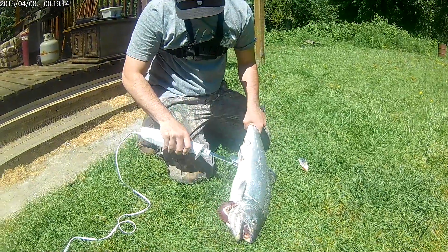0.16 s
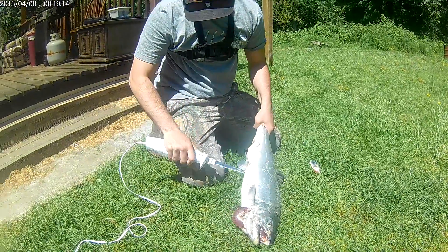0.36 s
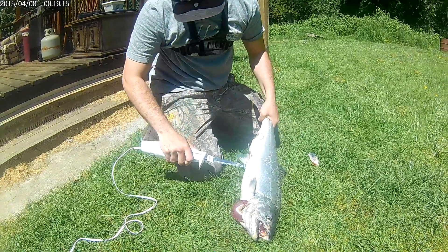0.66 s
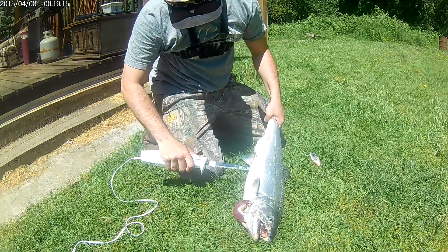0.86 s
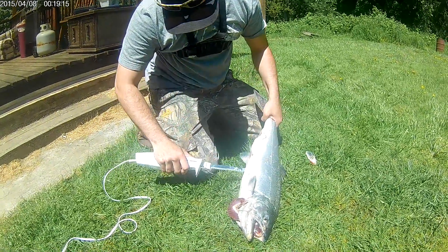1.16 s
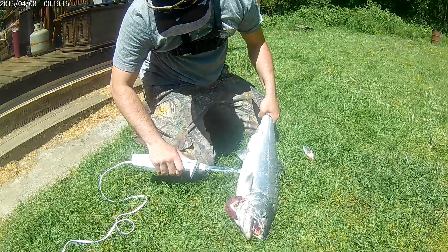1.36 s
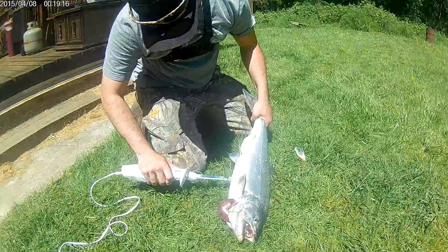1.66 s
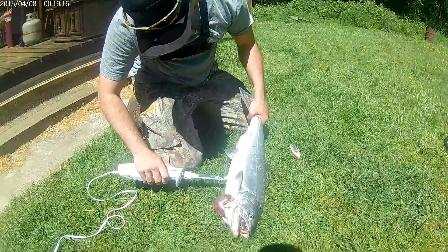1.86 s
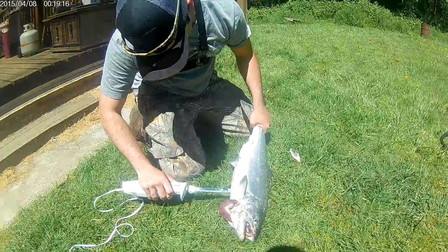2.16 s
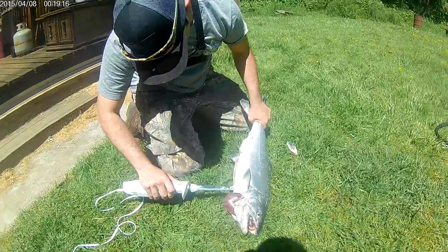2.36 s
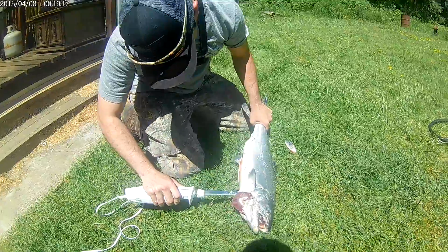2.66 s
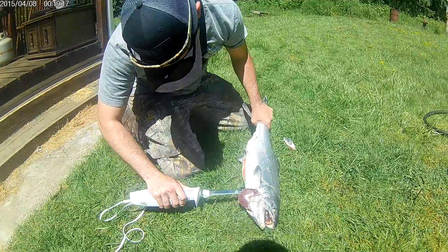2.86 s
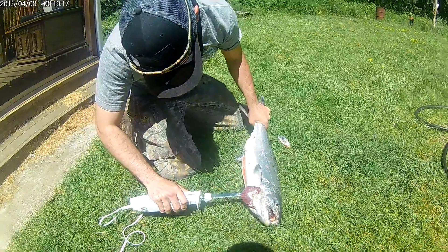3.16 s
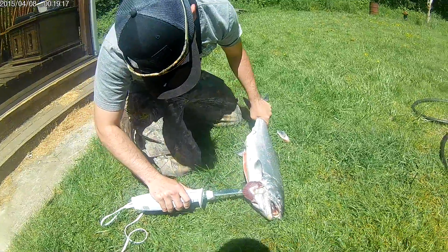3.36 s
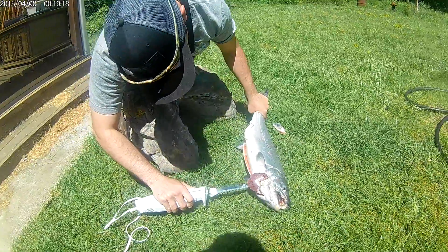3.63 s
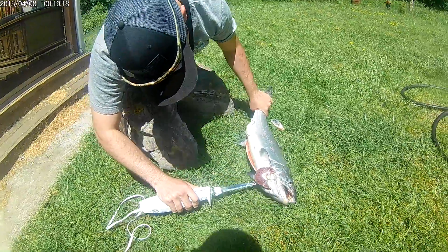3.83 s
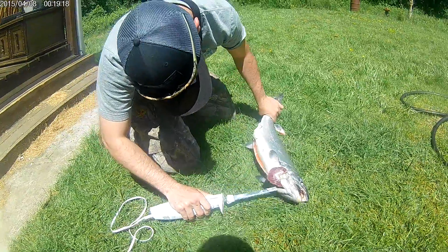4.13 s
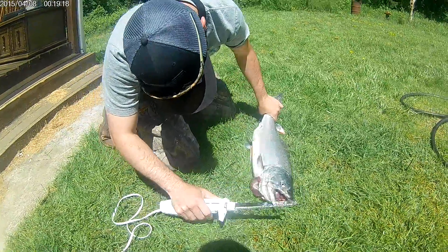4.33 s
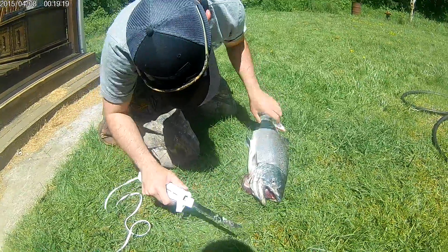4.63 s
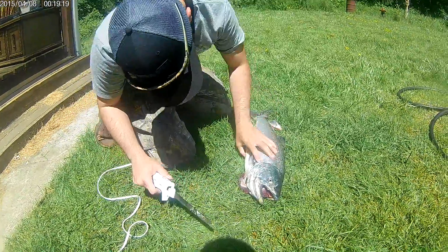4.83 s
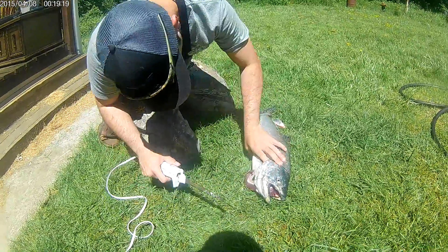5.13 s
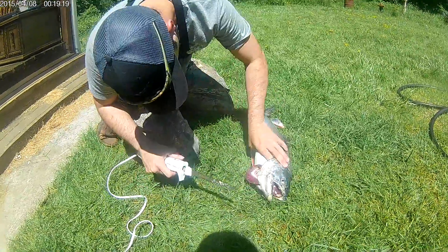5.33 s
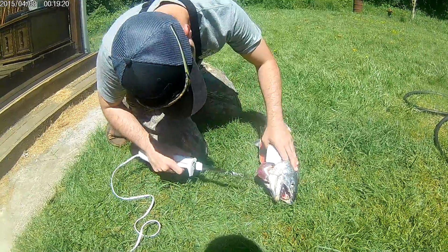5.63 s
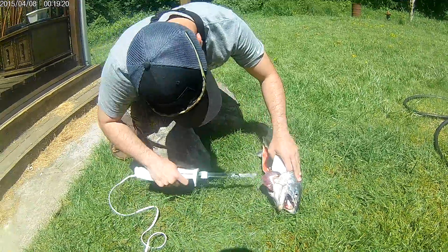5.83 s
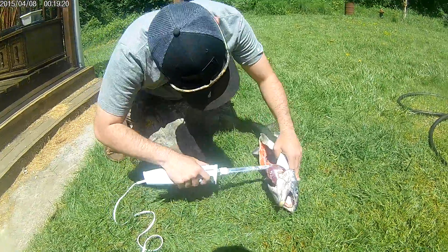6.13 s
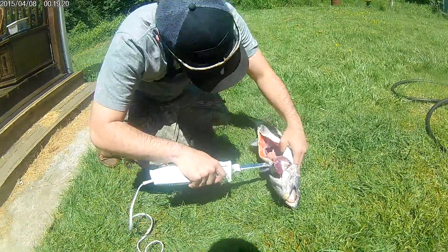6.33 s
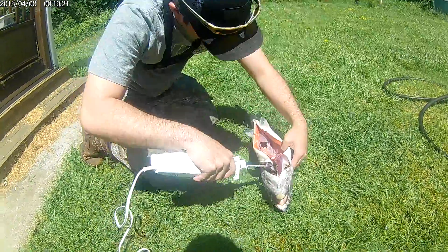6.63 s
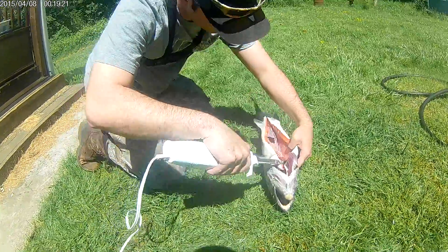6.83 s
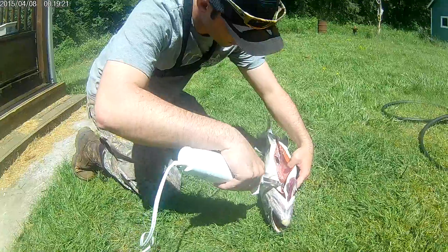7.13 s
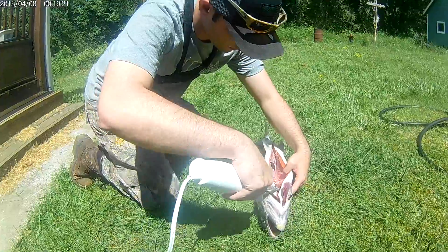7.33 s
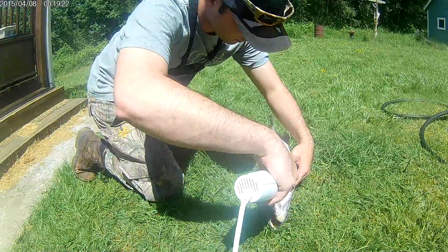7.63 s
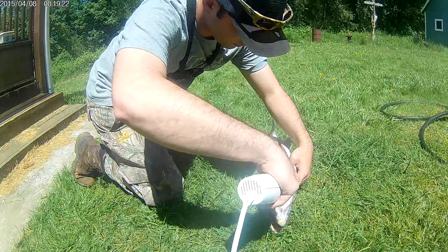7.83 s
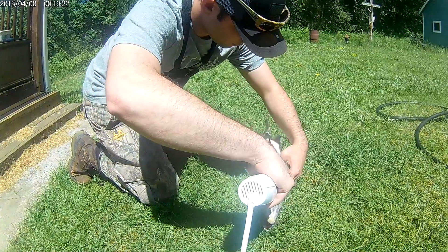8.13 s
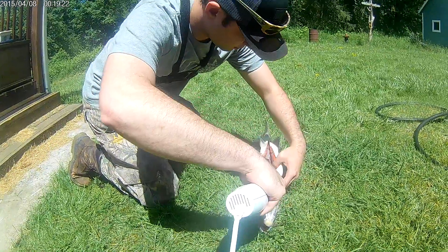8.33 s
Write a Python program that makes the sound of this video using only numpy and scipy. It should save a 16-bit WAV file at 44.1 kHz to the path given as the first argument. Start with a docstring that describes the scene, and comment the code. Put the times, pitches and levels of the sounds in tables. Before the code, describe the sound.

Outdoors on a lawn, a small cased camera hears an electric knife sawing a fish: fast dry clacking at about thirty strokes a second, with gear grind and faint motor whine. It slows briefly, restarts three times, then coasts to a stop near five seconds. Plastic handling knocks and rubs dot the cutting, then grow loud and crowded over soft wind rumble and hiss.

```python
"""The blades of an electric knife clack as it saws through a fish on a lawn, heard by a small camera
in a closed plastic case. Clicks and chatter at each stroke end, with gear grind between, excite
resonances of handle and blades; the motor whine is a set of sines locked to its rotation.
Throughout, and alone at the end, the hand that holds the case knocks and rubs it: struck modes
and filtered noise. Behind lie wind rumble, a dull outdoor hush, hiss and a thin whistle."""
import sys
import numpy as np
from scipy import signal
from scipy.fft import rfft, irfft
from scipy.io import wavfile

SR = 44100
rng = np.random.default_rng(int(sys.argv[2]) if len(sys.argv) > 2 else 0)


def store_wav(level_fs):
    """Save 16-bit WAV to argv[1]."""
    pcm = np.round(np.clip(np.atleast_2d(level_fs), -1, 1) * 32767)
    wavfile.write(sys.argv[1], SR, pcm.T.astype(np.int16))


N = 374409
HUM_HZ = 394.6   # resonance of the case

# the drive takes up its slack after each coast; from the last time on the knife is silent: (time [s])
BITES_S = [.568, 2.758, 3.5, 5.0]


def amp(db):
    """Level in decibels to amplitude ratio."""
    return 10 ** (np.asarray(db) / 20)


def rms_one(x):
    """Normalisation to unit root-mean-square."""
    return x / np.sqrt(np.mean(x ** 2) + 1e-20)


def in_time(rows):
    """Linear interpolation of each column over time, which is the first column."""
    s, *columns = np.transpose(rows)
    return [np.interp(np.arange(N) / SR, s, c) for c in columns]


def butter(x, hz, kind, order=2):
    """Maximally flat (Butterworth) filtering."""
    return signal.sosfilt(signal.butter(order, hz, kind, fs=SR, output="sos"), x)


def peak(x, hz, width_hz):
    """Damped second-order resonance with about unit gain on top."""
    r = np.exp(-np.pi * width_hz / SR)
    zeros = [(1 - r * r) / 2, 0, (r * r - 1) / 2]
    poles = [1, -2 * r * np.cos(2 * np.pi * hz / SR), r * r]
    return signal.lfilter(zeros, poles, x + 1e-18)


def body(x, modes):
    """Modal superposition: parallel resonances of alternating sign, each applied twice for dark valleys."""
    total = 0
    for k, (hz, width_hz, db) in enumerate(modes):
        wide_hz = 1.52 * width_hz   # two in series narrow to about width_hz
        mode = peak(peak(x, hz, wide_hz), hz, wide_hz)
        total = total + amp(db) * mode * (-1) ** k
    return total


def ring(clicks, hz, t60):
    """Impulse response of a damped oscillator: a unit click starts a decaying sine of height 1."""
    r, w = amp(-60 / (t60 * SR)), 2 * np.pi * hz / SR
    return signal.lfilter([0, np.sin(w)], [1, -2 * r * np.cos(w), r * r], clicks + 1e-18)


def hush():
    """Spectral shaping of noise: far outdoor sound dulled by the case, plus electronic hiss and whistle."""
    # spectrum of the hush and hiss: (frequency [Hz], relative density [dB per Hz])
    hush_spectrum = [(59, -34.5), (100, -2.5), (156, -11), (277, -13), (302, -20), (415, -22.5), (452, -20),
                     (481, -14), (570, -21), (1200, -16), (1420, -21), (3050, -40), (8830, -44),
                     (9410, -41), (16000, -37.5)]
    hush_db, whistle_hz, whistle_db = -65, 9620, -82
    hz, db = np.transpose(hush_spectrum)
    bin_hz = np.arange(N // 2 + 1) * SR / N
    colour = amp(np.interp(np.log(bin_hz + 1), np.log(hz), db))
    noise = rms_one(irfft(rfft(rng.standard_normal(N)) * colour, N))
    whistle = np.sin(2 * np.pi * whistle_hz * np.arange(N) / SR)
    return amp(hush_db) * noise + amp(whistle_db) * whistle


def wind():
    """Turbulent pressure on the microphone port: slowly modulated low noise that also stirs the case hum."""
    # strength of the wind: (time [s], rumble level [dB])
    rumble_levels = [(0.0, -55), (0.59, -59.5), (1.09, -58.5), (1.28, -57), (1.44, -49), (1.68, -53.5),
                     (1.94, -51.5), (4.99, -55.5), (5.25, -54.5), (5.7, -55.5), (6.81, -49.5), (6.93, -50),
                     (7.12, -52.5), (7.47, -55.5), (8.32, -54.5), (8.49, -60)]
    buffet_db = -21.5   # relative to the rumble
    rumble_db, = in_time(rumble_levels)
    lumps = amp(3.3 * rms_one(butter(rng.standard_normal(N), 9, "low")))
    rumble = butter(rng.standard_normal(N), 26.0, "low")
    rumble = butter(butter(rumble, 220, "low", order=1), 8.5, "high")
    buffet = butter(rng.standard_normal(N), [110, 380], "band")
    blown = lumps * amp(rumble_db) * (rms_one(rumble) + amp(buffet_db) * rms_one(buffet))
    return blown + amp(8) * peak(blown, HUM_HZ, 18)


def rubs():
    """Frictional excitation: skin slipping on plastic is uneven noise in short bursts that stir case modes."""
    # rubs on the case: (time [s], length [s], level before the burst envelope [dB], low-pass corner [Hz])
    rub_rows = [(1.517, 0.14, -51, 7340), (1.556, 0.022, -45.5, 1310), (1.74, 0.12, -56, 1210),
                (2.169, 0.034, -53.5, 8200), (2.344, 0.032, -58.5, 1270), (4.196, 0.067, -61, 1010),
                (5.102, 0.016, -56.5, 4600), (5.878, 0.01, -64.5, 5000), (6.525, 0.03, -66, 3900),
                (6.319, 0.051, -44.5, 2300), (6.403, 0.013, -56.5, 6000), (6.634, 0.034, -41.5, 2040),
                (6.672, 0.03, -56, 7000), (6.705, 0.025, -59.5, 4970), (6.777, 0.041, -63.5, 4970),
                (6.877, 0.021, -41, 1620), (6.899, 0.038, -61, 7240), (7.014, 0.079, -64, 5650),
                (7.246, 0.037, -38.5, 1780), (7.387, 0.064, -50.5, 840), (7.586, 0.034, -44.5, 2080),
                (7.596, 0.031, -63, 7100), (7.682, 0.017, -51, 2040), (8.15, 0.016, -64.5, 6000)]
    out, t = np.zeros(N), np.arange(6000) / SR
    for s, length_s, db, top_hz in rub_rows:
        unevenness = amp(4 * rng.standard_normal(6000 // 60).repeat(60))
        grit = rng.standard_normal(6000) * unevenness
        rise = np.clip(t / 0.0014, 0, 1)
        fall = np.clip((length_s - t) / 0.0092 + .5, 0, 1) * np.exp(-t / 0.097)
        slip = butter(butter(grit, top_hz, "low", order=5), 750, "low", order=1)
        slip = rms_one(butter(slip, 89, "high")) * rise * fall
        start = int(s * SR)
        out[start:start + 6000] += amp(db) * slip
    hum = amp(3) * peak(out, HUM_HZ, 22)
    wall = amp(2.5) * peak(out, 864, 160)
    return out + hum + wall


def knocks():
    """Impulsive excitation: knocks crack the case wall, push the microphone and leave a hum; a seam snaps."""
    # knocks, levels ahead of the gains below except the thump:
    # (time [s], crack level [dB], thump level [dB], hum level [dB], thump frequency [Hz])
    knock_rows = [(.009, -31, -37.5, -68, 118), (.43, -33.5, -39, -70, 44.4), (.444, -46, -60, -69, 46),
                  (.546, -30.5, -32, -68, 125), (0.631, -45, -45.5, -68, 79), (1.245, -39, -61, -77, 75),
                  (1.405, -33, -36.5, -80, 123), (1.446, -35.5, -43, -60, 45), (1.512, -58, -31, -55, 50),
                  (1.57, -37, -33.5, -57, 96), (1.627, -31.5, -45, -59, 46), (1.736, -41, -26, -60, 55),
                  (1.777, -48, -39, -47.5, 45), (1.888, -43, -46, -63.5, 106), (2.341, -47, -63, -42.5, 46),
                  (4.028, -35.5, -38, -66, 45.5), (4.157, -36.5, -37.5, -80, 44.4),
                  (5.11, -39.5, -36.5, -41, 43.2), (5.878, -54, -36.5, -51.5, 45.4),
                  (6.218, -53, -35.5, -85, 58.7), (6.323, -27.5, -27, -43, 58), (6.544, -49, -52, -61, 59),
                  (6.637, -21, -23.5, -36, 53.7), (6.745, -42.5, -42, -56, 46),
                  (6.885, -23.5, -20.5, -44.5, 99), (7.022, -45, -40, -65, 66.4),
                  (7.247, -22.5, -20.5, -37.5, 83), (7.389, -20.5, -19, -56, 84),
                  (7.398, -33, -27.5, -64, 78), (7.41, -35, -25.5, -52, 109), (7.421, -31, -25.5, -61, 83),
                  (7.438, -45, -32.5, -50, 97), (7.529, -28, -25.5, -47, 71),
                  (7.591, -27.5, -22, -64, 104.5), (7.687, -24, -25.5, -42.5, 101),
                  (7.698, -55, -38, -48, 120), (7.852, -32.5, -32, -51, 52), (7.896, -67, -30.5, -48, 78),
                  (7.913, -37, -29.5, -41, 46.6), (8.156, -48, -59, -56.5, 48), (8.24, -44.5, -38, -60, 44)]
    # modes of the case wall: (frequency [Hz], width [Hz], level [dB])
    wall_modes = [(226, 160, 7), (823, 210, -4), (1330, 770, -11.5), (1914, 180, -4), (2950, 98, -18),
                  (3890, 150, -29)]
    # snaps of the seam: (time [s], level ahead of the gain below [dB])
    snap_rows = [(.43, -43.5), (.444, -61), (.546, -56), (1.406, -43.5), (1.512, -58), (1.571, -40.5),
                 (1.626, -62), (1.734, -62), (1.888, -63), (2.342, -66), (6.745, -63)]
    # modes of the seam: (frequency [Hz], width [Hz], level [dB])
    seam_modes = [(5010, 760, 3), (6800, 490, -27), (10170, 930, -0.5)]
    hum_t60_s, thump_cycles = 0.17, 3.25   # the thump falls by 60 dB in so many cycles
    colour_db = 4   # spread of the strengths with which a knock strikes each wall mode

    s, crack_db, thump_db, hum_db, thump_hz = np.transpose(knock_rows)
    at = (s * SR).astype(int)
    crack, hum, snap = np.zeros((3, N))
    crack[at], hum[at] = -amp(crack_db), amp(hum_db)
    snap_s, snap_db = np.transpose(snap_rows)
    snap[(snap_s * SR).astype(int)] = -amp(snap_db)

    push = butter(butter(crack, 1513, "low", order=4), 180, "high", order=1)
    out = amp(21) * push + amp(24) * body(snap, seam_modes)
    colour = amp(colour_db * rng.standard_normal((len(at), len(wall_modes))))
    for k, mode in enumerate(wall_modes):
        strike = np.zeros(N)
        strike[at] = crack[at] * colour[:, k] * (-1) ** k
        out += amp(18.5) * body(strike, [mode])
    out += amp(5) * ring(butter(hum, 383, "low"), HUM_HZ, hum_t60_s)

    t = np.arange(6000) / SR
    for i, db, hz in zip(at, thump_db, thump_hz):   # the case rocks on its mount for a few cycles
        decay = amp(-60 * t * hz / thump_cycles)
        rock = np.sin(2 * np.pi * hz * t) * decay * (1 - np.exp(-t / 0.0017))
        out[i:i + 6000] -= amp(db) * rock
    return out


def drive():
    """Motor dynamics: torque falls near free speed, drag slows the coast. Speed, pull, seconds coasted."""
    # trigger pulls: (pressed [s], released [s], free speed [strokes/s],
    # sag under load [strokes/s3], drag when coasting [strokes/s2])
    pull_rows = [(-.004, .152, 32.117, 0, 42.644), (.517, 2.491, 34.644, .928, 60.037),
                 (2.737, 3.322, 33.371, 0, 40.813), (3.484, 4.209, 32.902, 0, 19.72)]
    torque, torque_fall = 210.239, .444   # strokes/s2; exponent of free speed over speed
    coast_s, step_s, start_speed = 1.223, .004, 25.842   # time constant s, time step s, strokes/s

    pressed, released, free, sag, drag = np.transpose(pull_rows)
    t = np.arange(0, BITES_S[-1], step_s)
    pull = np.searchsorted(pressed, t) - 1
    since_press, to_release = t - pressed[pull], released[pull] - t
    on = np.clip(since_press / step_s, 0, 1) * np.clip(to_release / step_s, 0, 1)
    top = free[pull] - sag[pull] * since_press ** 2
    speed = [start_speed]
    for share, goal, brake in zip(on, top, drag[pull]):
        v = speed[-1]
        driven = share * torque * ((goal / v) ** torque_fall - 1)
        braked = (1 - share) * (brake + v / coast_s)
        speed.append(max(v + step_s * (driven - braked), 1))

    now = np.arange(N) / SR
    bite = np.minimum(np.searchsorted(BITES_S, now), len(pull_rows) - 1)
    return np.interp(now, t, speed[1:]), bite, np.maximum(now - released[bite], 0)


def stroke_end(turn, speed, width_s, uneven_db, click_db):
    """Impact at blade reversal: one hard click inside a short burst of partly repeating chatter."""
    same = .6   # share of the chatter's power that repeats on every stroke
    since_s = ((turn + .5) % 1 - .5) / speed + .002   # time since the click
    luck = rng.standard_normal(400)[(turn + .5).astype(int)]   # one draw a stroke
    hit = np.diff(np.sign(since_s), prepend=0) > 0
    at, here = np.flatnonzero(hit), np.arange(N)
    nearest = at[np.searchsorted((at[1:] + at[:-1]) / 2, here)]
    repeated = rng.standard_normal(N)[here - nearest]
    rattle = np.sqrt(same) * repeated + np.sqrt(1 - same) * rng.standard_normal(N)
    burst = np.exp(-.5 * (since_s / width_s) ** 2)
    return amp(uneven_db * luck) * (amp(click_db) * hit + burst * rattle)


def whine(speed, turn, pull, coasted_s):
    """Order tracking: wavering sines at multiples of motor rotation swell as they cross handle resonances."""
    # motor orders: (cycles a motor turn [1], resonance [Hz], width [Hz], share above resonance [dB],
    # level in the 2nd pull [dB], in the 3rd [dB], in the 4th [dB])
    whine_rows = [(5, 1830, 90, -40, -57, -99, -99), (8, 2830, 55, -16, -72, -105, -81),
                  (16, 5250, 230, -10, -75, -74, -100), (24, 6600, 500, -30, -88, -85, -84)]
    motor_turns = 11   # per stroke
    waver = amp(2 * rms_one(butter(rng.standard_normal((4, N)), 15, "low")))
    out = 0
    for w, (order, hz, width_hz, off_db, *pull_db) in zip(waver, whine_rows):
        order_hz = order * motor_turns * speed
        near = np.exp(-.5 * ((order_hz - hz) / width_hz) ** 2)
        pull_amp = np.append(0, amp(pull_db))[pull]   # none in the first pull
        level = (near + amp(off_db) * (order_hz > hz)) * pull_amp
        out = out + level * w * np.sin(2 * np.pi * order * motor_turns * turn)
    return out * amp(-200 * coasted_s)   # dies soon after release


def knife():
    """Source and filter: short out-strokes, longer back-strokes and gear grind excite handle and blades."""
    # knife as it is turned and loaded: (time [s], middle body level [dB], low body re middle [dB],
    # upper handle re middle [dB], treble re middle [dB], out-stroke accent [dB])
    knife_rows = [(0, -61, -5, -5, -8, 5), (.3, -65.5, -4, -1, -9, -5), (.57, -63.5, 2.5, -5.5, -10, -1),
                  (.9, -63.5, 3, -10, -6, -3), (1.25, -61, 0, -10, -7, 5), (1.6, -58, 2, -6.5, -9.5, -2),
                  (2.1, -59, 2.5, -5.5, -10, -3.5), (2.4, -57.5, -2.5, -4.5, -10, -3.5),
                  (2.76, -60, 4, -6.5, -11.5, 2.5), (3.0, -56, -4, -9, -11.5, 3),
                  (3.45, -57, -2.5, -9, -11, 6.5), (3.7, -55.5, -8.5, -10.5, -14, 6),
                  (4.2, -56, -10, -10, -9.5, 1.5), (4.42, -56, -3, -7, -5.5, -1),
                  (4.6, -62.5, 2, -0.5, -6, -8.5), (4.9, -58, -2, -12, -16, 1)]
    # modes of the handle, low, middle and upper: (frequency [Hz], width [Hz], level [dB])
    low_modes = [(1828, 257, 0)]
    mid_modes = [(748, 97, -4), (1279, 117, -8.5), (1976, 122, -4.5), (2259, 192, 1)]
    high_modes = [(2443, 455, -4.5), (2754, 310, -6)]
    # modes of the blades, then one rung at both stroke ends: (frequency [Hz], width [Hz], level [dB])
    blade_modes = [(3725, 610, -2.5), (5470, 650, -7), (6880, 680, -10.5), (8760, 500, -8.5),
                   (10780, 730, -17.5)]
    ring_modes = [(4080, 186, 10)]
    start_turn = .297   # strokes
    rasp, rasp_s = 0.78, 0.051   # extra share of grind as the drive bites, and for how long
    coast_db_per_s, idle_grind_db_per_s = 20, 13   # fade of the whole body sound; further fade of the grind

    speed, pull, coasted_s = drive()
    now = np.arange(N) / SR
    biting = sum(np.abs(now - s - rasp_s / 2) < rasp_s / 2 for s in BITES_S)
    turn = start_turn + np.cumsum(speed) / SR
    mid_db, low_db, high_db, treble_db, accent_db = in_time(knife_rows)
    back = stroke_end(turn, speed, width_s=.003, uneven_db=1.5, click_db=19)
    out = stroke_end(turn + .5, speed, width_s=.0018, uneven_db=1.2, click_db=17)

    # the same teeth mesh on every stroke, louder with speed
    tooth_pattern = rms_one(irfft(np.exp(2j * np.pi * rng.random(701))))
    teeth = tooth_pattern[(turn % 1 * 1400).astype(int)]
    grind = (teeth + .45 * rng.standard_normal(N)) * speed / 30
    grind = grind * (1 + rasp * biting) * amp(-idle_grind_db_per_s * coasted_s)

    dull = 0.38 * grind + back + amp(-1.0) * out
    bright = 0.47 * grind + amp(-accent_db) * back + amp(accent_db) * out
    ringing = 0.15 * grind + 0.62 * back + amp(accent_db) * out
    blades = body(bright, blade_modes) + body(ringing, ring_modes)
    parts = body(dull, low_modes), body(dull, mid_modes), body(dull, high_modes), blades
    low, mid, high, treble = (p / np.std(p[SR:4 * SR]) for p in parts)   # unit strength over 1-4 s
    mix = mid + amp(low_db) * low + amp(high_db) * high + amp(treble_db) * treble
    clatter = amp(mid_db - coast_db_per_s * coasted_s) * mix
    running = np.arange(N) < BITES_S[-1] * SR
    return running * (clatter + whine(speed, turn, pull, coasted_s))


def scene():
    """Linear superposition of all sources at the microphone."""
    return (knife() + knocks() + rubs() + wind() + hush())[None]


def record(dry):
    """Band limitation: a steep low-pass removes the top above 16 kHz."""
    return signal.sosfilt(signal.cheby2(24, 60, 16000, fs=SR, output="sos"), dry)


dry = scene()
out = record(dry)
store_wav(out)
```